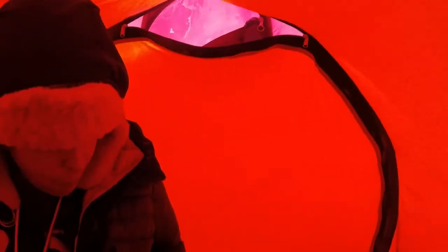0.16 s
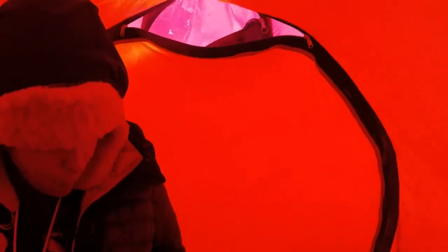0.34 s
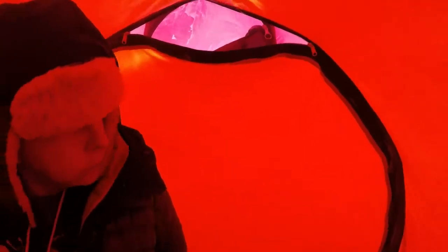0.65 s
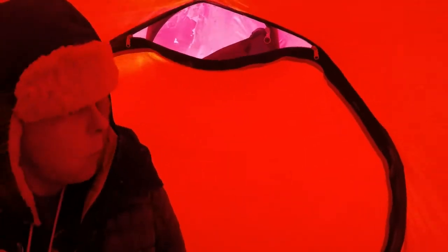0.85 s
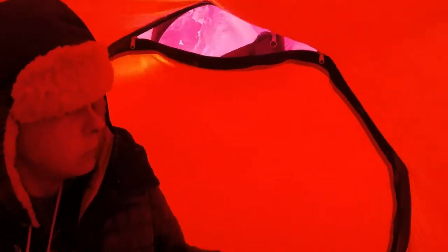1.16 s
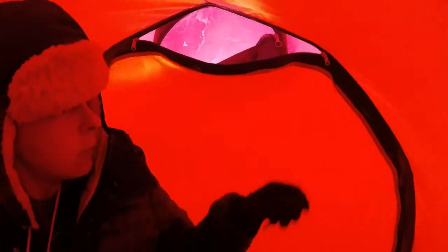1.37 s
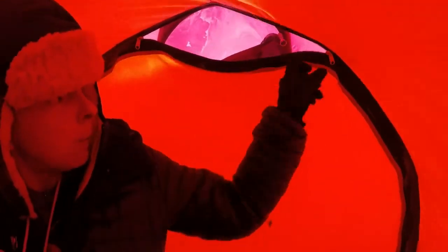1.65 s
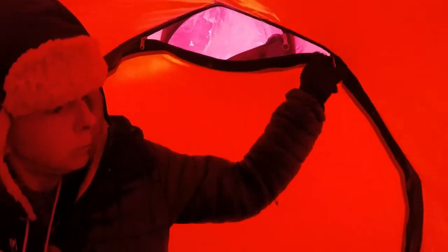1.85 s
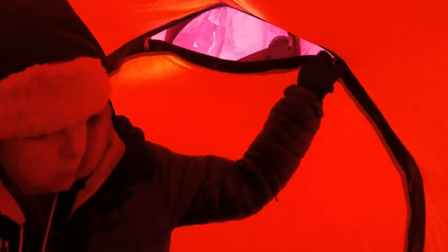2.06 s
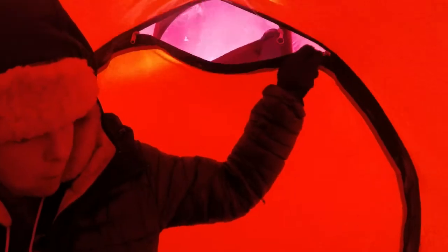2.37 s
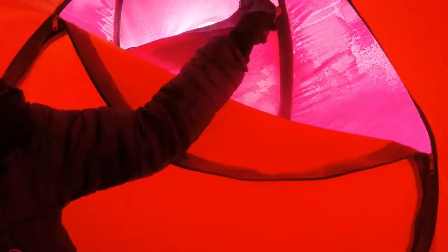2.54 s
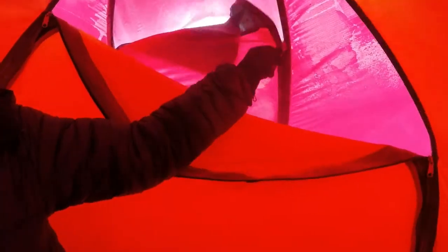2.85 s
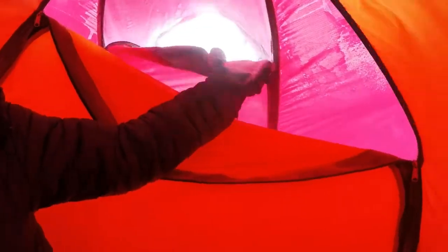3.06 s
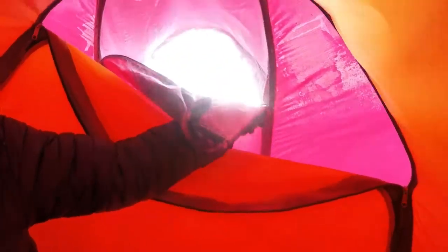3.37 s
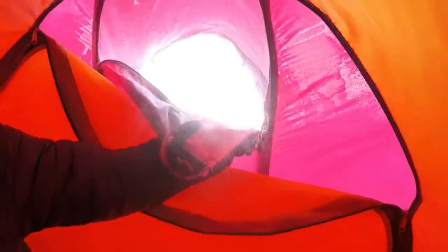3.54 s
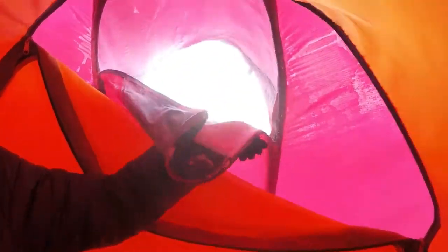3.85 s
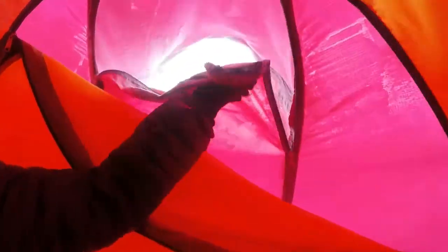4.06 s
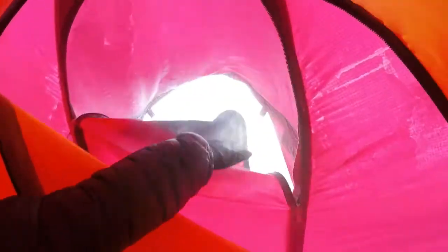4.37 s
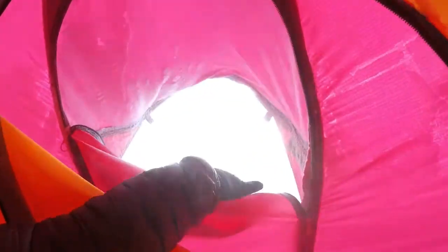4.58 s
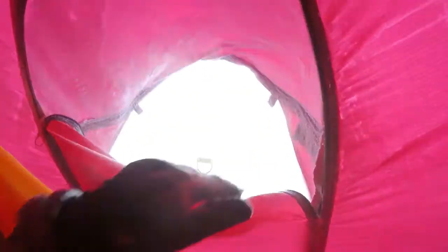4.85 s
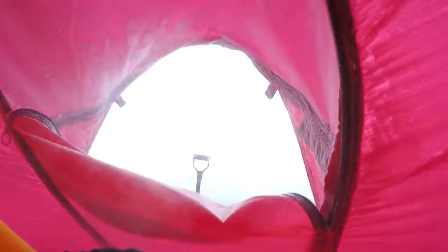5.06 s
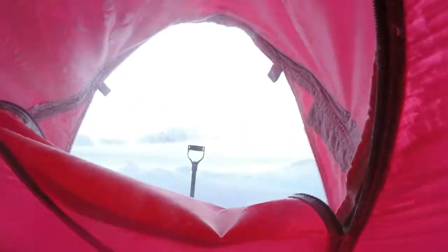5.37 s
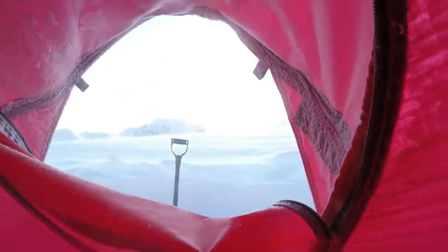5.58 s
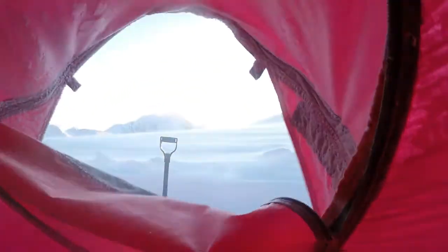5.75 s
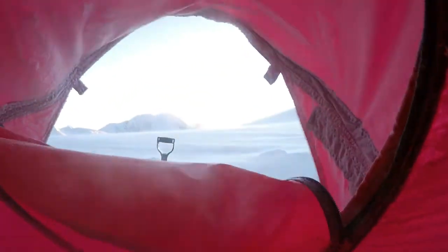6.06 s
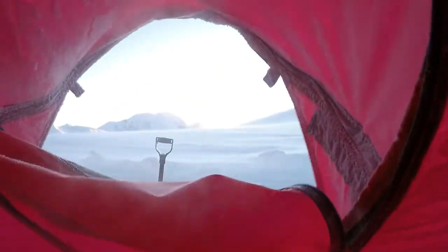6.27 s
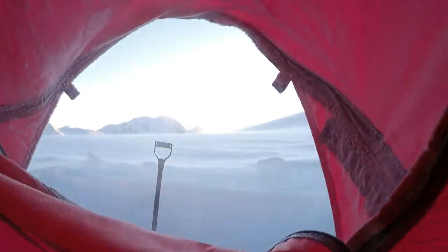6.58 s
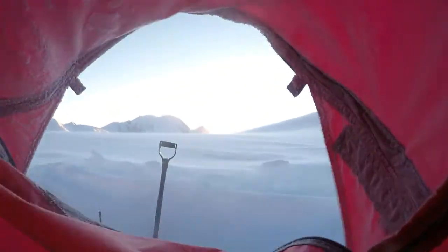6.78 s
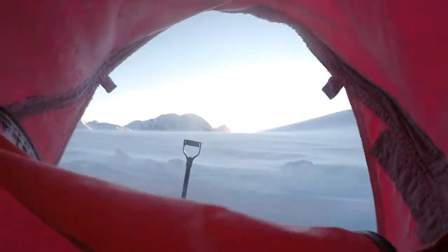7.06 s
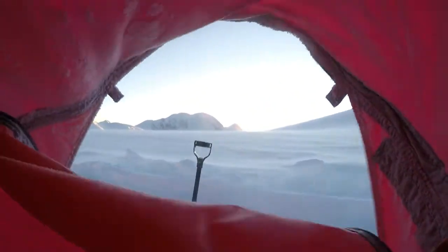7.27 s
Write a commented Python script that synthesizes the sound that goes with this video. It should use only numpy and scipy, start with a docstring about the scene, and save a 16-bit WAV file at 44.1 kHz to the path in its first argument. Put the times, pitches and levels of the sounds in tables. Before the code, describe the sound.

Violent wind flogs tent fabric close by: rapid slaps, sharp snaps and dry crinkles over deep wind buffeting and hissing blown snow.

```python
"""The flysheet of a tent flogs in a snow storm, close to a camera: slaps drum the walls and shed puffs of crinkle.
Whips, flaps, snaps and ticks are timed bursts of shaped noise; low swells in the rumble are short dull swings.
Behind them blown snow hisses in sheets, a gap whistles, wind rumbles on the microphone and a faint hiss swells.
A limiter ducks overloads. Near the end the level dips briefly; later the image narrows and the treble dulls."""
import sys
import numpy as np
from scipy import signal
from scipy.fft import rfft, irfft, next_fast_len
from scipy.io import wavfile
from scipy.ndimage import uniform_filter1d, minimum_filter1d, map_coordinates

SR = 44100
rng = np.random.default_rng(int(sys.argv[2]) if len(sys.argv) > 2 else 0)


def persist_wave(psi):
    """Save psi, clipped to +-1, as 16-bit WAV."""
    counts = np.round(np.clip(psi, -1, 1) * 32767).astype(np.int16)
    wavfile.write(sys.argv[1], SR, np.atleast_2d(counts).T)


N = 327222
TIME_S = np.arange(N) / SR
SIDES = np.array([[.5], [-.5]])  # shares of a left-right difference
TOP_HZ = 14200  # band limit

# Wind between volleys. Each row: time in seconds, flysheet flutter in dB, buffet in dB.
WIND = [(0.0, -33, -21), (0.33, -32.5, -20), (0.9, -32, -25), (1.13, -34.5, -20), (1.28, -32.5, -29.5),
        (1.47, -38.5, -23.5), (1.6, -33.5, -21), (2.05, -30.5, -22), (2.14, -34.5, -23.5),
        (2.42, -35.5, -19), (3.05, -33, -22), (3.64, -34.5, -20), (4.04, -35, -20.5), (4.3, -32, -21),
        (4.7, -32.5, -20.5), (5.8, -31, -18.5), (6.38, -33, -19.5), (6.41, -41, -22.5), (6.72, -41.5, -27),
        (7.07, -37.5, -21), (7.42, -33, -16.5)]
# Loose edge slaps once. Each row: start in seconds, level in dB.
FLAPS = [(0.467, -21), (.497, -20), (1.241, -20), (1.787, -22), (1.948, -25), (2.207, -25), (2.659, -19),
         (2.684, -17), (2.931, -34), (2.991, -17), (3.11, -19), (3.426, -22), (3.704, -22), (4.099, -15.5),
         (4.24, -20), (4.374, -22), (4.39, -24), (4.57, -24), (4.619, -20), (4.639, -15.5), (4.762, -21.5),
         (4.811, -21), (4.823, -17), (4.856, -15.5), (5.019, -21), (5.176, -24), (5.239, -17.5),
         (5.25, -17), (5.428, -14), (5.647, -21), (5.692, -20), (5.757, -17), (5.866, -18), (5.901, -15),
         (6.004, -16), (6.035, -14), (6.195, -18), (6.326, -29), (6.383, -15.5), (6.485, -18.5),
         (6.834, -24.5), (6.941, -20.5), (7.195, -16.5), (7.212, -22)]
# Fold snaps taut. Each row: start in seconds, level in dB, thump over level in dB, ring in Hz,
# ring over crack in dB, sizzle over crack in dB, left over right in dB.
SNAPS = [(0.5871, -21, -5, 6100, 8, 8.5, -7), (0.68, -21.5, -5, 2510, 11.5, 6.5, -7),
         (0.721, -10, 5, 1160, -2, -22, 3), (0.736, -9, -21, 2960, -4.5, -21, -1),
         (1.4134, -18.5, 4.5, 1000, 1.5, -0.5, -7), (2.011, -12, -10, 2640, -4, -9, 0),
         (2.085, -18.5, -6, 3480, -6, -16, -3), (2.213, -14.5, -3, 2300, -12, -5, -3),
         (2.693, -21, -4, 6530, 4, 9, -1), (2.702, -24, 5, 5750, 6, -2, -3),
         (2.848, -19, 12, 1626, 4.5, -10, -13.5), (4.644, -9, 2, 3050, -3, -8, 2),
         (5.067, -11, -6, 2930, -5, -6, 0), (5.288, -18.5, 3, 5930, 5, 5.5, 0),
         (5.303, -23, 0, 6060, 2, 6, 0), (6.241, -13, 0, 2450, -3, -14, 3),
         (6.497, -20, 11, 1330, 0, 0.5, 2), (6.654, -17, 5, 676, -10, -10, 1),
         (6.735, -23, 16.5, 1140, -1, -17, -1), (6.998, -14, 7, 1175, 0, -28, -9),
         (7.085, -20.5, 8.5, 706, 1, -10, -4), (7.321, -23, 4, 830, -2, -24, 0),
         (7.357, -21, 6, 870, 5, -25, 2)]
# Spectrum of rubbing nylon. Each row: frequency in Hz, relative density in dB.
NYLON = [(180, -30.5), (330, -2.5), (480, 1.5), (700, 1.5), (1100, -2), (1900, -10.5), (3000, -16),
         (4500, -23.5), (6300, -20), (7600, -40), (8400, -32), (10000, -42), (12500, -53), (14500, -55)]


def amp(db):
    """Amplitude factor of a level in dB."""
    return 10 ** (np.asarray(db) / 20)


def unit(x):
    """x scaled to rms 1."""
    return x / np.sqrt(np.mean(x ** 2) + 1e-20)


def along(points, hz):
    """Interpolate (Hz, value) points on a log frequency axis."""
    f, v = np.transpose(points)
    return np.interp(np.log(hz + 1), np.log(f + 1), v)


def curves(rows):
    """One value per sample for each column after the time."""
    s, *cols = np.transpose(rows)
    return [np.interp(TIME_S, s, c) for c in cols]


def wobble(rate):
    """A smooth random curve, rate knots a second."""
    knots = rng.standard_normal(int(N * rate / SR) + 4)
    return map_coordinates(knots, [np.arange(N) * rate / SR])


def filtered(x, response):
    """x times a complex response of frequency."""
    m = next_fast_len(N + SR // 2)
    return irfft(rfft(x, m) * response(np.fft.rfftfreq(m, 1 / SR)), m)[..., :N]


def causal(spectrum, hz):
    """Minimum-phase response of unit power, by folding the cepstrum."""
    gain = unit(amp(along(spectrum, hz)))
    cepstrum = irfft(np.log(gain + 1e-6))
    half = len(cepstrum) // 2
    cepstrum[1:half] *= 2
    cepstrum[half + 1:] = 0
    return np.exp(rfft(cepstrum))


def ports(pair, spectrum):
    """Two unrelated signals become one coloured sound at the left and right microphone ports."""
    # Each row: frequency in Hz, likeness of the ports (clipped to -1..1).
    alike = [(25, 1.5), (70, 0.7), (150, 2), (400, 1), (700, 1), (1100, 0.63), (2000, 0.42), (3500, 1.1),
             (5000, 0.56), (7000, -0.2), (10000, 0)]
    # Each row: frequency in Hz, phase lead of left over right in radians.
    lead_rad = [(60, -0.14), (200, 0.19), (450, -0.029), (700, -1.06), (950, -1.07), (1500, -0.39),
                (3000, 0.72), (5000, 0.41), (7000, -0.83), (10000, 0.95)]
    # Each row: frequency in Hz, left over right in dB.
    tilt_db = [(50, -1), (200, -2), (500, -4), (750, -3), (1000, 2), (1500, 3.5), (2100, 0.5), (3500, 0),
               (4800, -1), (5900, -7), (7200, -.5), (12000, -1)]

    def blend(hz):
        turn = np.arccos(np.clip(along(alike, hz), -1, 1)) / 2
        return causal(spectrum, hz) * [np.cos(turn), np.sin(turn)]

    def offset(hz):
        return amp(SIDES * along(tilt_db, hz)) * np.exp(1j * SIDES * along(lead_rad, hz))

    mid, side = filtered(pair, blend)
    return filtered(np.array([mid + side, mid - side]), offset)


def steadied(x, span):
    """x levelled to about rms 1 over span seconds, its finer grain kept."""
    size = max(int(span * SR), 8)
    power = uniform_filter1d(uniform_filter1d(np.mean(x ** 2, axis=0), size), size)
    return x / np.sqrt(np.abs(power) + 1e-12)


def impacts(rate, spread_db):
    """Impulses at random moments, rate a second, of clipped log-normal size."""
    return (rng.random(N) < rate / SR) * amp(spread_db * np.clip(rng.standard_normal(N), -2, 2))


def dying(x, life):
    """Every impulse of x fades with the time constant life in seconds."""
    return signal.lfilter([1], [1, -np.exp(-1 / (life * SR))], x)


def crinkle(rate, spread_db, smooth):
    """Two noise streams sharing the moments of tiny crease ticks on a smooth rub."""
    return unit(rng.standard_normal((2, N)) * (unit(impacts(rate, spread_db)) + smooth))


def burst_shape(t, attack_s, decay_s):
    """Exponential attack and decay of one impact."""
    return (1 - np.exp(-t / attack_s)) * np.exp(-t / decay_s)


def add(track, s, sound):
    """Mix a short sound in at s seconds."""
    start = round(s * SR)
    sound = sound[..., max(-start, 0):]
    part = track[..., max(start, 0):][..., :sound.shape[-1]]
    part += sound[..., :part.shape[-1]]


def push(t, hz, cycles):
    """The air shoved by a panel that jerks and swings back to rest; its decay is given in cycles."""
    swing = t * np.sin(2 * np.pi * hz * t) * np.exp(-t * hz / cycles)
    return unit(np.gradient(swing)) * np.sqrt(cycles / (hz * t[-1]) / 2)


def narrow(hz, width_hz):
    """Stereo noise of rms 1 in a narrow band round the pitch hz, given per sample."""
    white = rng.standard_normal((2, len(hz))) + 1j * rng.standard_normal((2, len(hz)))
    drift = signal.sosfilt(signal.butter(2, width_hz / 2, fs=SR, output="sos"), white)
    return unit(np.real(drift * np.exp(2j * np.pi * np.cumsum(hz) / SR)))


def storm():
    """Levels in dB of flysheet, wall and buffet: volleys rise, hold and die, adding power to the wind."""
    # Gust catches the tent. Each row: start in seconds, hold in seconds, flysheet in dB, wall in dB,
    # buffet in dB.
    volleys = [(0, 0.005, -22, -25, -8), (0.462, 0.042, -29.5, -19.5, -21), (0.666, 0.008, -32, -34, -24),
               (0.733, 0.068, -29, -23.5, -22), (0.888, 0.032, -25, -22, -15),
               (0.949, 0.021, -25, -18, -13.5), (1.026, 0.02, -32, -24, -19),
               (1.209, 0.019, -24.5, -25, -16), (1.545, 0.028, -27.5, -28, -15),
               (1.701, 0.0059, -29, -38, -26), (1.775, 0.024, -26.5, -18, -15.5),
               (1.9, 0.17, -34, -29.5, -23), (2.193, 0.026, -22.5, -16, -14.5),
               (2.26, 0.081, -26.5, -20, -22), (2.486, 0.022, -27.5, -21, -30),
               (2.651, 0.096, -28.5, -19, -18.5), (2.822, 0.031, -34.5, -16, -17),
               (2.914, 0.087, -37.5, -20, -20), (3.102, 0.1, -31.5, -25.5, -23),
               (3.405, 0.045, -24, -21, -16), (3.478, 0.061, -33.5, -22.5, -22),
               (3.688, 0.062, -25.5, -24, -19), (3.793, 0.041, -26, -22, -20.0),
               (3.905, 0.078, -25, -21.5, -14), (4.094, 0.064, -23.5, -19, -19),
               (4.188, 0.074, -28, -21.5, -19.5), (4.343, 0.056, -26, -18.5, -15.5),
               (4.448, 0.064, -21.5, -16.5, -22), (4.619, 0.038, -21.5, -16.5, -18),
               (4.762, 0.033, -26, -20, -16), (4.821, 0.038, -28, -17.5, -16),
               (4.962, 0.13, -24.5, -21.5, -24), (5.251, 0.054, -23, -18, -14.5),
               (5.33, 0.075, -28, -19, -29), (5.532, 0.1, -24.5, -21, -20), (5.729, 0.031, -25.5, -19, -16),
               (5.862, 0.02, -25, -20, -20), (5.91, 0.033, -24.5, -22, -20), (5.957, 0.045, -25, -24, -17),
               (6.037, 0.051, -30, -24, -24), (6.157, 0.044, -22.5, -17, -26),
               (6.226, 0.01, -26.5, -19, -26), (6.337, 0.036, -28, -17.5, -15.5),
               (6.472, 0.049, -31, -20.5, -27), (6.649, 0.0073, -47, -24, -18.5),
               (6.817, 0.019, -33, -24.5, -26), (6.926, 0.089, -31, -21, -19),
               (7.171, 0.075, -25, -17, -14), (7.383, 0.056, -26.5, -24, -30)]
    attack_s, release_s = 0.018, 0.022
    wall_over_flutter_db = 7.5  # the walls drum along with the flutter
    flutter_db, buffet_db = curves(WIND)
    power = amp([flutter_db, flutter_db + wall_over_flutter_db, buffet_db]) ** 2
    for s, hold, *levels_db in volleys:
        near = slice(*np.searchsorted(TIME_S, [s - .5, s + hold + .5]))
        rise = (TIME_S[near] - s) / attack_s
        fall = (s + hold - TIME_S[near]) / release_s
        shape = np.exp(np.minimum(0, np.minimum(rise, fall)))
        power[:, near] += np.outer(amp(levels_db), shape) ** 2
    return 10 * np.log10(power)


def slack():
    """The dB by which the flogging eases just before each slap or snap: the cloth hangs slack."""
    depth_db, lead_s, half_length_s = 2, 0.01, 0.0065
    t = np.arange(-SR // 25, SR // 25) / SR
    ease = np.zeros(N)
    for s, *_ in FLAPS + SNAPS:
        add(ease, s - lead_s + t[0], np.exp(-(t / half_length_s) ** 2))
    return depth_db * np.minimum(ease, 1)


def air():
    """A faint, smooth high hiss swells towards the end."""
    # Each row: frequency in Hz, relative density in dB.
    air_spectrum = [(5000, -18), (8000, 1), (11000, -5), (14000, -11)]
    end_db, rise_db_per_s = -49, 30
    before_end_s = TIME_S[::-1]
    return amp(end_db - rise_db_per_s * before_end_s) * ports(rng.standard_normal((2, N)), air_spectrum)


def whistle():
    """Air through a narrow gap in the door: a noise band whose pitch and level wander and flutter."""
    # Each row: time in seconds, pitch in Hz, level in dB.
    draught = [(0, 6300, -36.5), (.15, 6370, -36.5), (.22, 6430, -44.5), (.38, 6220, -38), (.48, 6650, -54),
               (.64, 6770, -40), (.71, 6270, -42), (.8, 6330, -40), (.92, 6800, -41), (1.07, 6330, -46),
               (1.18, 6530, -35), (1.32, 6400, -63), (1.43, 6400, -39), (1.52, 6250, -50), (1.6, 6630, -46),
               (1.74, 6250, -38), (1.85, 6400, -56), (1.96, 6660, -39), (2.1, 6430, -49), (2.23, 6750, -43),
               (2.43, 6100, -48), (2.75, 6620, -42), (3.1, 6010, -49), (3.5, 6170, -46), (5.42, 6300, -56),
               (5.495, 6250, -28), (5.62, 6460, -38), (5.72, 6200, -62)]
    width_hz, waver_hz, flutter_db, right_over_left_db = 340, 80, 2.3, 6.6
    pitch_hz, level_db = curves(draught)
    band = narrow(pitch_hz + waver_hz * wobble(rate=45), width_hz)
    return amp(level_db + flutter_db * wobble(rate=60) - 2.0 - right_over_left_db * SIDES) * band


def buffet(gust_db):
    """Turbulence pumps the whole tent in lumps; small eddies press on each port separately."""
    # Eddies that hit the ports directly. Each row: time of peak in seconds, level in dB.
    eddy_hits = [(0, -32), (2.07, -29), (2.99, -27), (3.661, -20), (4.19, -17), (4.78, -37), (5.78, -41),
                 (6.15, -30), (6.34, -24)]
    # Each row: frequency in Hz, relative density in dB.
    rumble_spectrum = [(10, -35), (22, 6), (35, 8.5), (50, 10.5), (66, 8.5), (100, 4.5), (140, -8),
                       (260, -50.5), (1500, -120)]
    eddy_half_length_s, small_eddies_over_buffet_db = 0.11, -12
    direct = amp(gust_db + small_eddies_over_buffet_db)
    for s, db in eddy_hits:
        direct = direct + amp(db - 1.0) / (1 + ((TIME_S - s) / eddy_half_length_s) ** 2) ** 2

    def low_band(hz):
        return hz / (hz + 15) / (1 + (hz / 60) ** 2.2) * (hz < 1000)

    eddies = steadied(filtered(rng.standard_normal((2, N)), low_band), span=0.053)
    pumping = steadied(ports(rng.standard_normal((2, N)), rumble_spectrum), span=0.053)
    lumps_db = 0.69 * wobble(rate=21)
    return amp(gust_db + lumps_db - 0.5) * pumping + amp(1.5) * direct * eddies


def snow(volley_db):
    """Ice grains sweep over the flysheet in uneven sheets, louder when it flogs."""
    # Blown snow. Each row: time in seconds, hiss in dB.
    drift_rows = [(0, -39), (.42, -41.5), (.58, -32.5), (.75, -40), (1.0, -37.5), (1.4, -45), (1.95, -39),
                  (2.28, -39.5), (2.42, -42.5), (2.6, -41.5), (2.74, -38.5), (2.9, -41), (3.62, -41),
                  (3.82, -33.5), (4.04, -37.5), (4.17, -35), (4.35, -36), (4.55, -42), (4.72, -42.5),
                  (4.98, -36.5), (5.2, -35.5), (5.42, -36.5), (5.55, -31), (5.635, -31), (5.67, -42),
                  (5.82, -37.5), (5.9, -32), (6.06, -32), (6.12, -42), (6.38, -38.5), (6.41, -46),
                  (7.42, -49)]
    # Each row: frequency in Hz, relative density in dB.
    snow_spectrum = [(1500, -37), (3200, -8.5), (4800, -9.5), (5700, -2.5), (6350, 1), (7000, 0),
                     (7700, -4.5), (8300, -12), (9800, -13.5), (11000, -22), (12700, -23), (14500, -68)]
    hiss_per_flog = 0.17  # dB per dB that a volley adds: the cloth shakes the snow off
    drift_db, = curves(drift_rows)
    flurries = impacts(rate=200, spread_db=4)
    grains = crinkle(rate=6000, spread_db=3, smooth=.9)
    sheets = np.sqrt(unit(uniform_filter1d(dying(flurries, life=0.0066), size=330)) + 0.18)
    hiss_db = drift_db + hiss_per_flog * volley_db + 2.3 * wobble(rate=11)
    return amp(hiss_db + 0.27) * steadied(ports(sheets * grains, snow_spectrum), span=0.34)


def low_swells():
    """Low swells in the rumble: each a short dull swing of random phase, some under a slap."""
    # Each row: centre in seconds, level in dB, pitch in Hz.
    swell_rows = [(.111, -8.5, 88), (0.204, -7.5, 93), (.361, -11, 78), (0.466, -7, 80), (.475, -11, 230),
                  (.497, -14, 78), (0.651, -6.5, 83.5), (.728, -5.5, 88), (0.794, -6, 81.5),
                  (0.934, -9.5, 72), (0.965, -9, 102.8), (1.05, -7.5, 82), (1.159, -12.5, 200),
                  (1.217, -3, 89), (1.564, -16, 73), (1.705, -9.5, 97), (1.789, -9, 93.2), (1.938, -9, 107),
                  (2.041, -8.5, 84), (2.205, -5.5, 95), (2.303, -8, 100), (2.348, -9, 94),
                  (2.571, -12, 80.6), (2.678, -6, 210), (2.685, -6, 93), (2.737, -7, 52.7),
                  (2.853, -5, 119), (2.963, -6, 77), (3.176, -14, 97), (3.268, -9, 71.4), (3.331, -9, 75),
                  (3.395, -9, 87.5), (3.518, -7.5, 74), (3.59, -11, 77), (3.682, -5, 76), (3.748, -6, 97),
                  (3.818, -12, 100), (3.925, -13, 75), (3.943, -6, 218), (3.971, -8, 83.5),
                  (4.125, -6.5, 135), (4.202, -15, 78), (4.335, -5.5, 97), (4.385, -11, 121),
                  (4.456, -6, 87), (4.497, -4, 180), (4.636, -5, 230), (4.704, -6, 91), (4.752, -4, 99),
                  (4.865, -11, 99), (5.068, -7, 116), (5.129, -8.5, 109), (5.243, -4, 95), (5.278, -2, 107),
                  (5.434, -3.5, 104), (5.554, -10, 72), (5.589, -10, 94), (5.773, -5, 102),
                  (5.904, -2.5, 152), (6.01, -5.5, 73.6), (6.076, -6, 74), (6.173, -6, 94), (6.245, -6, 94),
                  (6.5, -2, 100), (6.942, -5, 131), (6.994, -6, 113), (7.159, -10, 107), (7.235, -7, 83.5)]
    rise_cycles, fall_cycles = 0.55, 0.61  # how soon the swing builds and dies
    t = np.arange(-SR // 16, SR // 16) / SR
    out = np.zeros(N)
    for (s, db, hz), turn in zip(swell_rows, rng.random(len(swell_rows))):
        cycles = t * hz
        swing = np.exp(-(cycles / np.where(t < 0, rise_cycles, fall_cycles)) ** 2)
        add(out, s + t[0], amp(db - 1.9) * swing * np.sin(2 * np.pi * (cycles + turn)))
    return out


def ticks():
    """A single crease buckles at once: a broad, dry noise tick that is gone within milliseconds."""
    # Each row: start in seconds, level in dB, centre in Hz.
    tick_rows = [(.069, -29, 6000), (.216, -25, 3000), (.795, -26, 2200), (.889, -24, 2300),
                 (.903, -16.5, 1900), (.948, -23, 5260), (.953, -18, 2200), (.965, -17.5, 2900),
                 (.971, -28, 4500), (1.384, -28, 2400), (1.702, -24, 4200), (2.208, -16.5, 2200),
                 (2.610, -31, 6500), (2.849, -17, 1650), (3.259, -29, 2800), (3.713, -18, 1700),
                 (3.723, -19, 2000), (3.816, -21, 2000), (3.960, -19, 3800), (4.390, -20, 3010),
                 (4.639, -15.5, 2900), (4.811, -17, 1500), (4.823, -21, 2000), (4.859, -24, 3200),
                 (5.022, -17, 2400), (5.246, -15, 2500), (5.253, -18, 1800), (5.428, -22, 1600),
                 (5.643, -21, 2600), (5.733, -20, 3700), (5.763, -18, 1500), (5.849, -18, 4500),
                 (5.86, -14, 2400), (5.906, -19, 4300), (5.910, -15, 3000), (5.932, -28, 5500),
                 (5.960, -20, 3800), (5.981, -16, 3300), (6.036, -27, 2600), (6.164, -15, 1900),
                 (6.179, -13.5, 3300), (6.936, -19, 1600), (7.031, -24, 1500), (7.096, -29, 2500),
                 (7.362, -20, 1400)]
    attack_s, decay_s = 0.0004, 0.0022
    spread = 1.6  # band edges lie this factor below and above the centre
    t = np.arange(SR // 40) / SR
    shape = burst_shape(t, attack_s, decay_s)
    out = np.zeros((2, N))
    for s, db, hz in tick_rows:
        edges_hz = np.clip([hz / spread, hz * spread], 100, TOP_HZ)
        shared, *own = rng.standard_normal((3, len(t)))
        bandpass = signal.butter(2, edges_hz, "bandpass", fs=SR, output="sos")
        band = signal.sosfilt(bandpass, shared + 0.42 * np.array(own))
        add(out, s, amp(db + 1.2) * steadied(band, span=0.0022) * shape)
    return out


def crackle(flog_db):
    """Fine crackle of taut nylon: clumped noise that grows faster than the flogging and sinks in lulls."""
    # Each row: frequency in Hz, relative density in dB.
    crackle_spectrum = [(900, -24), (1800, 2.5), (3200, 0.5), (5000, -4.5), (7000, -6), (9000, -19),
                        (14500, -48)]
    level_db, at_flog_db, growth_db_per_db = -36.5, -23.5, 1.38
    clumps = np.sqrt(np.abs(dying(impacts(rate=330, spread_db=3) ** 2, life=.0012)))
    grains = steadied(ports(clumps * rng.standard_normal((2, N)), crackle_spectrum), span=0.036)
    return amp(level_db + growth_db_per_db * (flog_db - at_flog_db)) * grains


def creases(flog_db):
    """Stiff cold nylon: the harder it flogs, the more often a crease gives way in a clump of ticks."""
    # Each row: frequency in Hz, relative density in dB.
    crease_spectrum = [(700, -33), (1500, 6), (2500, 6), (3600, -6), (5000, -8), (7500, -14), (10000, -38),
                       (14500, -50)]
    per_second = np.clip(60 * amp(flog_db + 24), 0, 120)
    pops = np.sqrt(np.abs(dying(impacts(per_second, spread_db=2) ** 2, life=.0016)))
    grains = ports(crinkle(rate=4400, spread_db=5, smooth=0.56), crease_spectrum)
    return amp(flog_db - 8.5) * pops * grains


def snaps():
    """A fold cracks taut close by: milliseconds of crack, rough ring and sizzle, and a swing of the panel."""
    # Each row: frequency in Hz, relative density in dB.
    crack_spectrum = [(250, -23), (700, 13), (1500, -1.5), (3000, -0.5), (4500, -5), (7000, -10),
                      (12000, -54), (14500, -79)]
    # Each row: frequency in Hz, relative density in dB.
    sizzle_spectrum = [(2000, 5), (4500, 0.5), (6200, 9), (8000, 2.5), (10000, -16), (12500, -26),
                       (14500, -24)]
    ring_wander_hz = 270  # rms stray of the ring pitch
    ring_decay_s = 0.0089  # damping on top of the burst decay
    t = np.arange(SR // 12) / SR
    shape = burst_shape(t, attack_s=0.00084, decay_s=0.0056)
    crack, sizzle, body = np.zeros((3, 2, N))
    for s, db, thump_db, ring_hz, ring_db, sizzle_db, pan_db in SNAPS:
        burst = amp(db - 5.0 + pan_db * SIDES) * shape
        pitch_hz = ring_hz + ring_wander_hz * unit(dying(rng.standard_normal(len(t)), life=0.00075))
        ring = np.exp(-t / ring_decay_s) * np.sin(2 * np.pi * np.cumsum(pitch_hz) / SR)
        add(crack, s, burst)
        add(sizzle, s, burst * amp(sizzle_db))
        add(body, s, burst * amp(ring_db + 3.0) * ring)
        add(body, s, amp(db + thump_db) * push(t, hz=121, cycles=0.26))

    def tear(spectrum):
        return steadied(ports(crinkle(rate=3000, spread_db=3, smooth=0.96), spectrum), span=0.0043)

    return crack * tear(crack_spectrum) + sizzle * tear(sizzle_spectrum) + body


def flaps():
    """A loose edge slaps the tent: a sharp, coarse burst of crinkle a few milliseconds long."""
    # Each row: frequency in Hz, relative density in dB.
    flap_spectrum = [(150, -22), (350, 4.5), (900, 5.5), (1500, -2.5), (2500, -13.5), (4000, -14),
                     (6300, -18), (8000, -36), (14500, -76)]
    t = np.arange(SR // 20) / SR
    shape = burst_shape(t, attack_s=0.0015, decay_s=0.0061)
    bursts = np.zeros(N)
    for s, db in FLAPS:
        add(bursts, s, amp(db + 3.5) * shape)
    grains = crinkle(rate=1800, spread_db=2.5, smooth=0.56)
    return bursts * steadied(ports(grains, flap_spectrum), span=0.0035)


def whips():
    """A panel whips out and fills: a rattle of small slaps swells, peaks over one low shove and dies away."""
    # Each row: time in seconds, level in dB, thump over level in dB, left over right in dB.
    whip_rows = [(0.002, -12, 2.5, 2), (0.897, -18, -5, -4), (0.954, -9.5, -5, -6), (1.772, -14, -3, 1),
                 (2.201, -7.5, -7, 5), (2.988, -12, 3, 10), (3.423, -10, 2, 1), (3.942, -8.5, 1.5, 1),
                 (4.373, -7, 6, 10), (4.468, -10.5, -5, 10), (4.622, -12, -3, 9), (4.773, -5.5, -5, 1),
                 (4.855, -13, 6.5, 11), (5.246, -11, 2, 12), (5.547, -10, -4, 15), (5.641, -9, 8, 7),
                 (5.852, -9, 1, 6), (5.905, -8.5, 5, 7), (5.978, -9, -6, 3), (6.034, -10.5, 10.5, 4.5),
                 (6.159, -5.5, -1, 3)]
    t = np.arange(SR // 5) / SR
    lead_s = .04
    rise = (t - lead_s - .003) / 0.0078
    fall = (lead_s + 0.0045 - t) / 0.016
    bloom = np.exp(np.minimum(rise, fall))
    swell, shove = np.zeros((2, N)), np.zeros(N)
    for (s, db, thump_db, pan_db), chance in zip(whip_rows, rng.standard_normal((len(whip_rows), 2))):
        add(swell, s - lead_s, amp(db - 12.0 + pan_db * SIDES) * bloom)
        panel = push(t, hz=170 * np.exp(0.14 * chance[1]), cycles=0.72)
        add(shove, s, amp(db + thump_db - 3.5) * np.sign(chance[0]) * panel)
    slaps = impacts(rate=190, spread_db=2.5)
    rattle = unit(dying(slaps, life=.002)) + .3
    grains = crinkle(rate=2500, spread_db=5.0, smooth=0.65)
    return swell * steadied(ports(rattle * grains, NYLON), span=0.034) + shove


def flogging(wall_db, flog_db):
    """Ripples run down the cloth and slap: each slap drums the wall and sheds a puff of crinkle."""
    # Each row: frequency in Hz, relative density in dB.
    wall_spectrum = [(50, -39.5), (90, -4), (125, -1), (200, -2), (290, -6.5), (420, -10.5), (650, -20.5),
                     (1500, -33.5), (8000, -120)]
    slaps = impacts(rate=260, spread_db=3)
    strokes = np.array([slaps * np.sign(rng.standard_normal(N)), slaps * rng.standard_normal(N)])
    drum_noise = unit(strokes) + .5 * rng.standard_normal((2, N))
    drum = steadied(ports(drum_noise, wall_spectrum), span=0.022)
    puffs = np.sqrt(unit(dying(slaps ** 2, life=0.018)) + 0.25)
    grain = crinkle(rate=3000, spread_db=3, smooth=.6)
    rustle = steadied(ports(unit(puffs * grain) + 0.24 * unit(strokes), NYLON), span=0.067)
    return amp(wall_db + 0.82) * drum + amp(flog_db + 0.27) * rustle


def opened(x):
    """The door is pulled down: the slack cloth drums more hollowly, by a crossfade to a filtered copy."""
    # Each row: time in seconds, share open.
    door_open = [(3.0, 0), (4.5, 0.84)]
    # Each row: frequency in Hz, gain in dB.
    open_colour = [(100, 0), (160, 0), (235, 2), (330, 0.5), (460, 2.5), (650, 0), (1500, 0.5)]
    share, = curves(door_open)
    hollow = filtered(x, lambda hz: amp(along(open_colour, hz)))
    return x + np.clip(share, 0, 1) * (hollow - x)


def scene():
    """Everything that the storm does to the tent."""
    flog_db, wall_db, gust_db = storm()
    flutter_db, _ = curves(WIND)
    ripple_db = 1.7 * wobble(rate=35) - slack()
    drumming = opened(flogging(wall_db + ripple_db, flog_db + ripple_db) + whips() + flaps())
    cloth = drumming + creases(flog_db) + crackle(flog_db + ripple_db) + ticks() + snaps()
    rumble = low_swells() + buffet(gust_db)
    return cloth + rumble + snow(flog_db - flutter_db) + whistle() + air()


def narrowed(x):
    """The stereo image closes to the centre by a crossfade to a duller mono sum."""
    # Each row: frequency in Hz, gain in dB.
    dull_colour = [(150, 0), (290, 0.5), (500, 0), (900, 0), (1350, -2.5), (1900, 1), (3000, 0.5),
                   (6000, -2.5), (7500, -8), (11000, -1.5)]
    from_s, db_per_s = 6.6, 59
    width = amp(-db_per_s * np.maximum(TIME_S - from_s, 0))
    dull = filtered(x.mean(axis=0), lambda hz: amp(along(dull_colour, hz)))
    return width * x + (1 - width) * dull


def dipped(x):
    """The level drops within milliseconds and comes back at a steady pace in dB."""
    dip_s, depth_db, recovery_db_per_s = 6.39, 9.5, 104
    since_s = TIME_S - dip_s
    down_db = (since_s > 0) * np.maximum(depth_db - recovery_db_per_s * since_s, 0)
    return x * amp(-uniform_filter1d(down_db, size=130))


def record(dry):
    """The camera's limiter ducks at once on an overload and recovers steadily; then its band limit."""
    ceiling, recovery_db_per_s = .98, 110
    sound = dipped(narrowed(dry))
    over_db = 20 * np.log10(np.maximum(np.abs(sound).max(axis=0) / ceiling, 1))
    ramp_db = recovery_db_per_s * TIME_S
    duck_db = np.maximum.accumulate(over_db + ramp_db) - ramp_db
    held_gain = minimum_filter1d(amp(-duck_db), size=81)  # reaches ahead of the peak
    gain = uniform_filter1d(uniform_filter1d(held_gain, size=41), size=41)
    return filtered(sound * gain, lambda hz: hz < TOP_HZ)


dry = scene()
out = record(dry)
persist_wave(out)
```